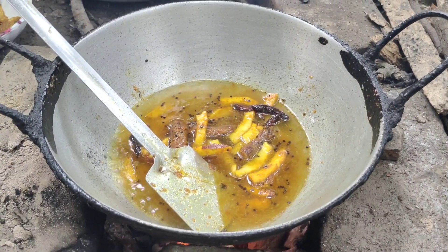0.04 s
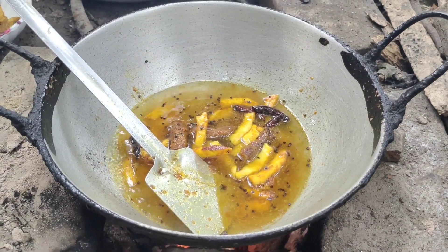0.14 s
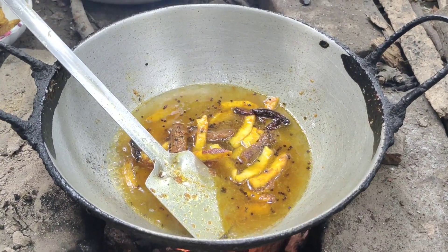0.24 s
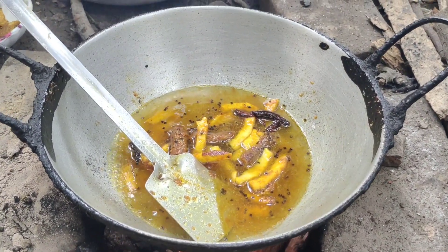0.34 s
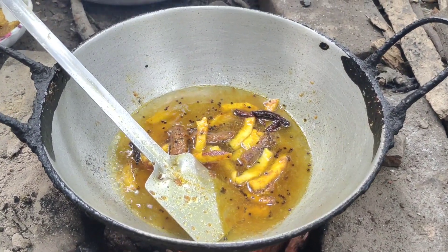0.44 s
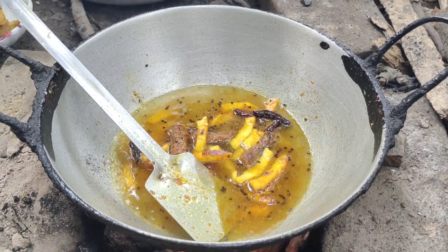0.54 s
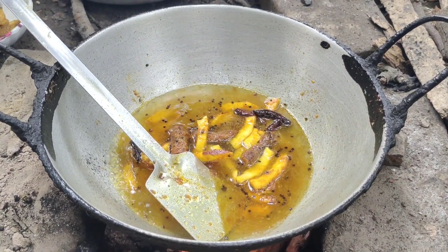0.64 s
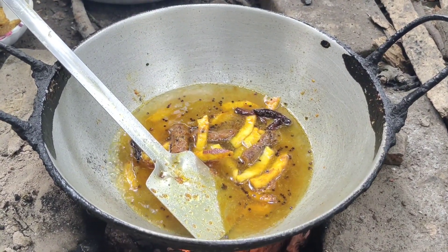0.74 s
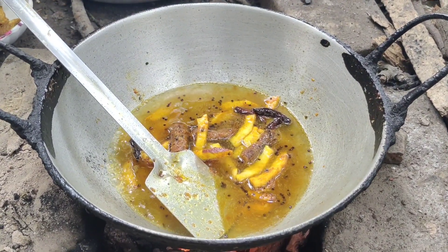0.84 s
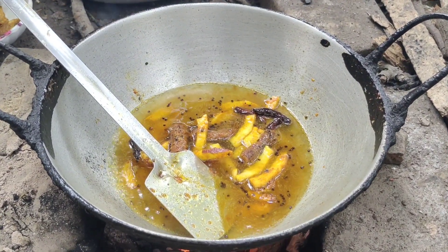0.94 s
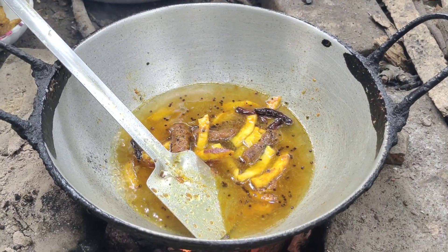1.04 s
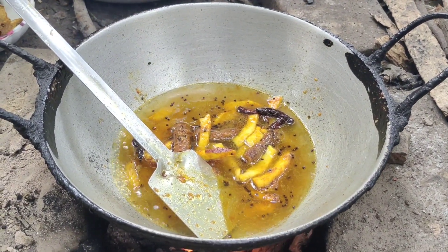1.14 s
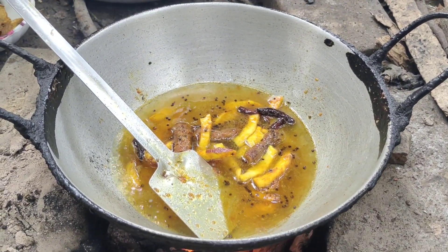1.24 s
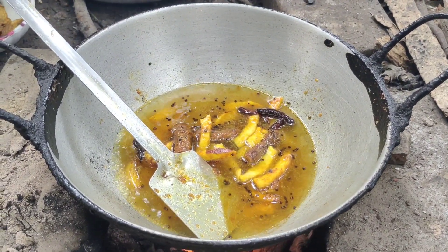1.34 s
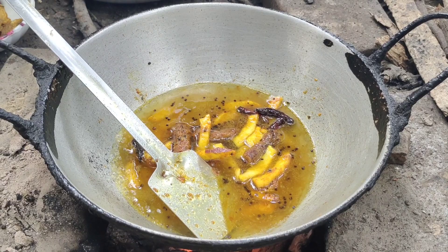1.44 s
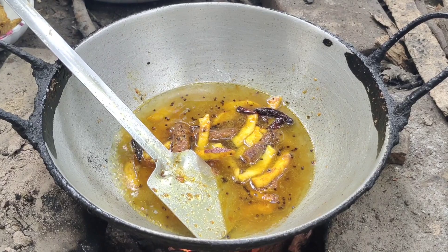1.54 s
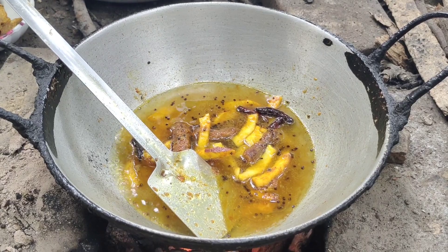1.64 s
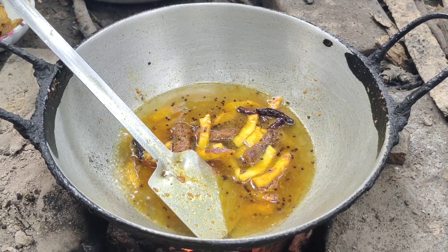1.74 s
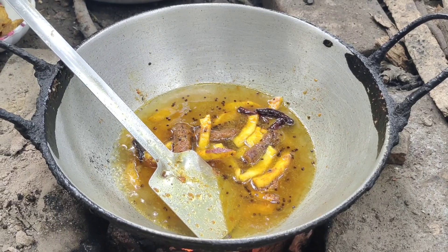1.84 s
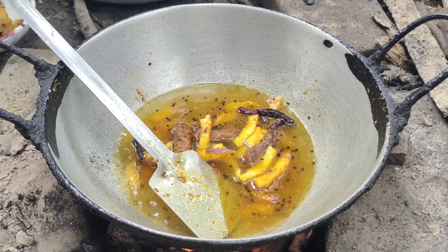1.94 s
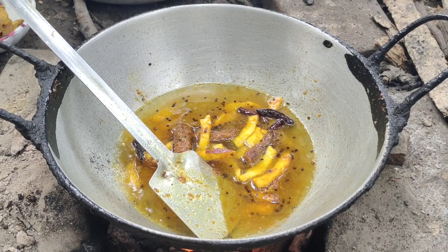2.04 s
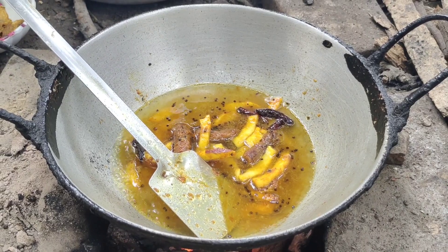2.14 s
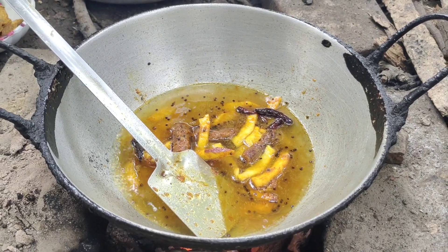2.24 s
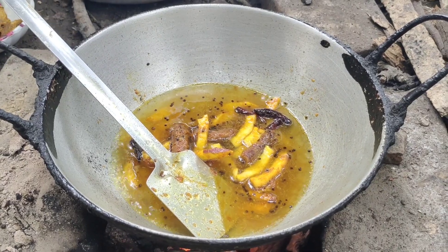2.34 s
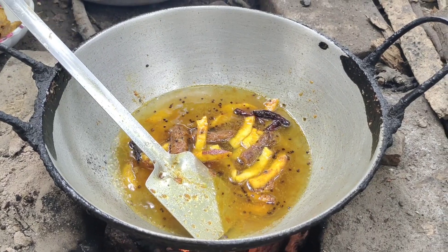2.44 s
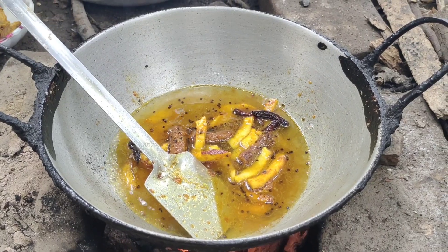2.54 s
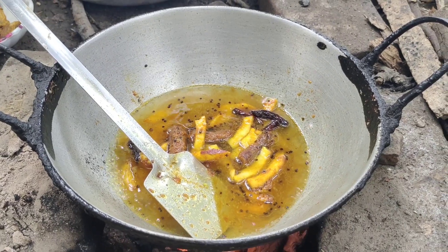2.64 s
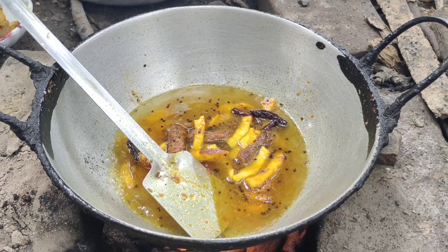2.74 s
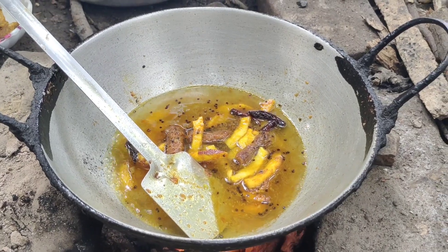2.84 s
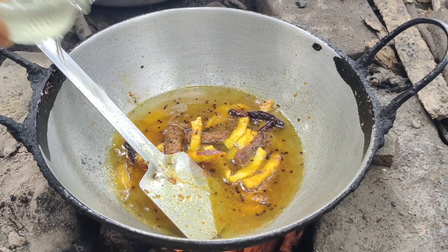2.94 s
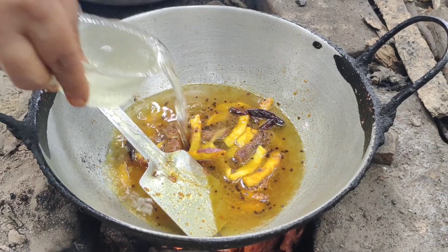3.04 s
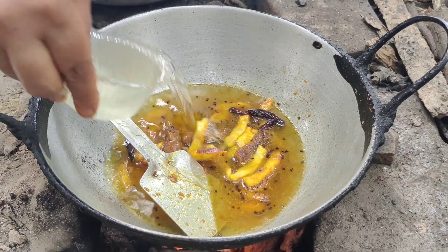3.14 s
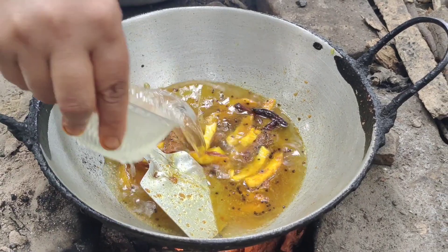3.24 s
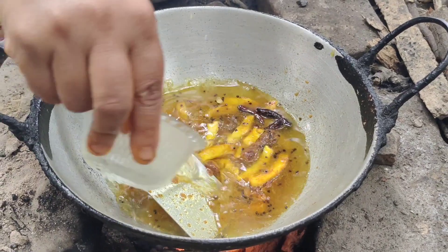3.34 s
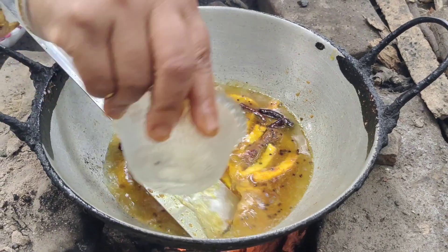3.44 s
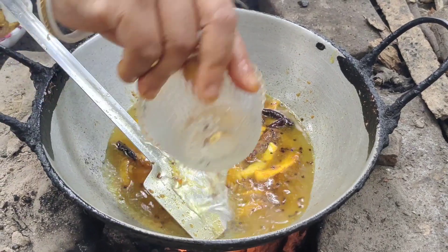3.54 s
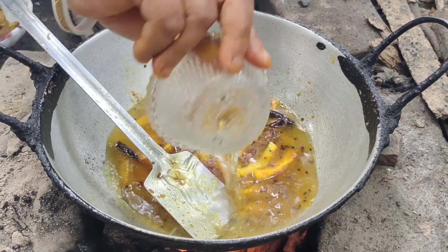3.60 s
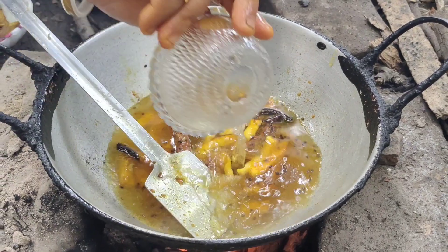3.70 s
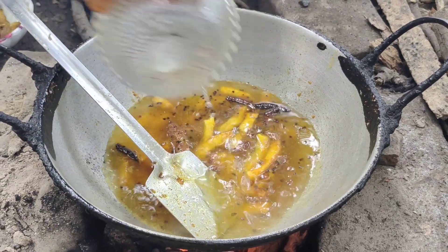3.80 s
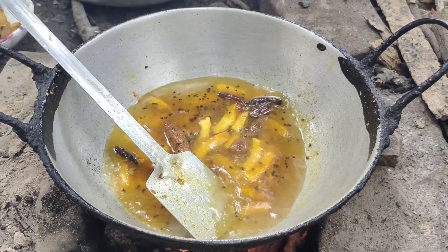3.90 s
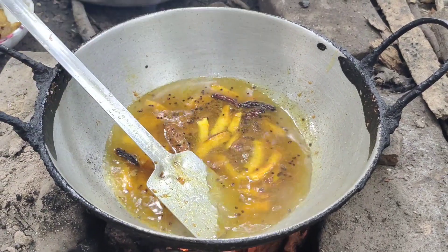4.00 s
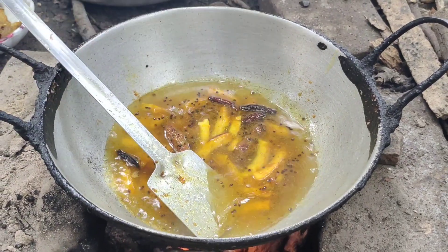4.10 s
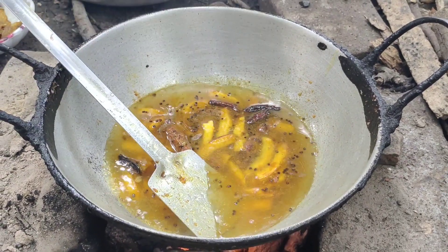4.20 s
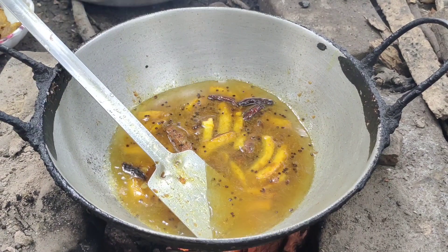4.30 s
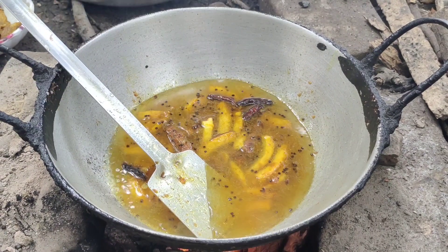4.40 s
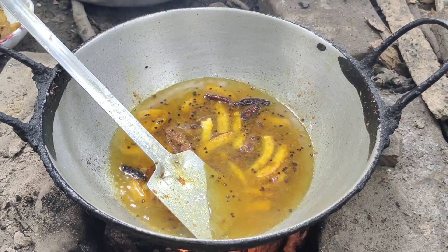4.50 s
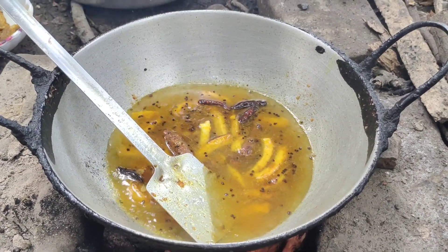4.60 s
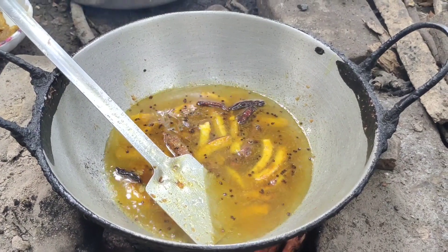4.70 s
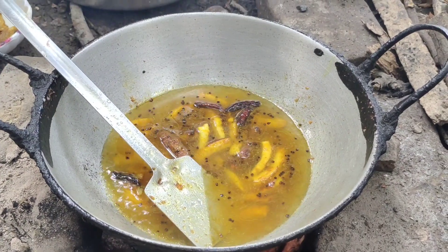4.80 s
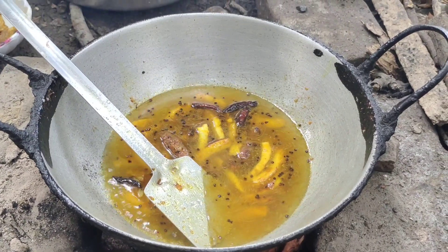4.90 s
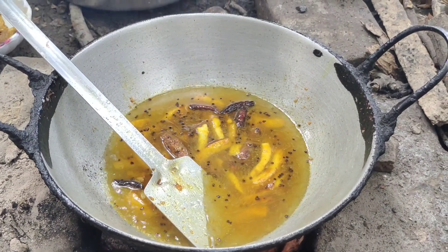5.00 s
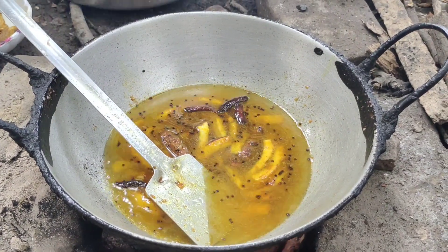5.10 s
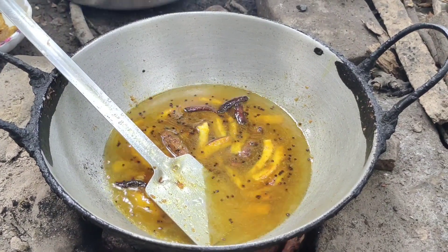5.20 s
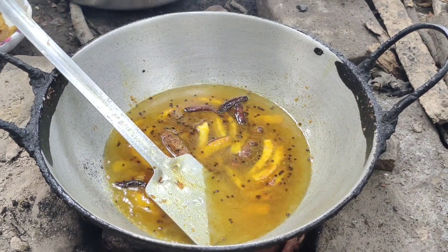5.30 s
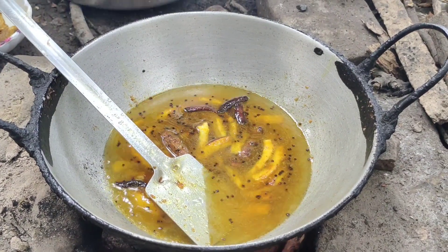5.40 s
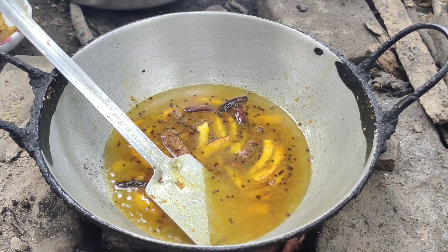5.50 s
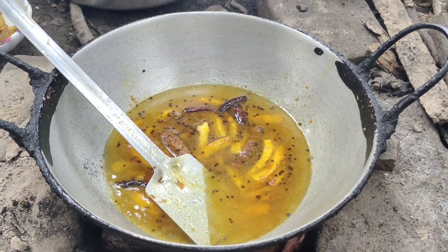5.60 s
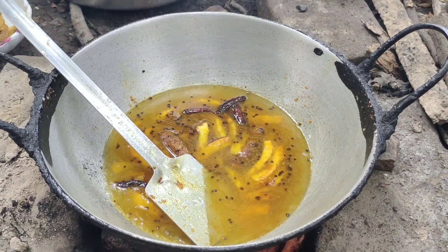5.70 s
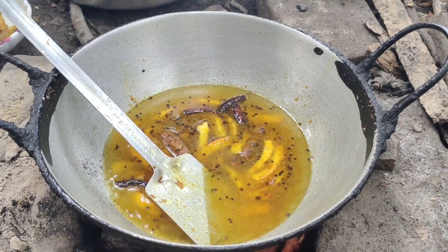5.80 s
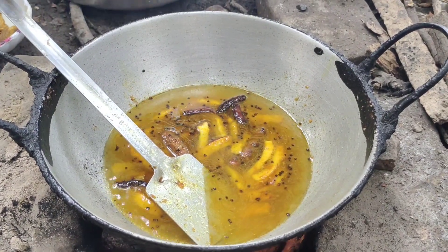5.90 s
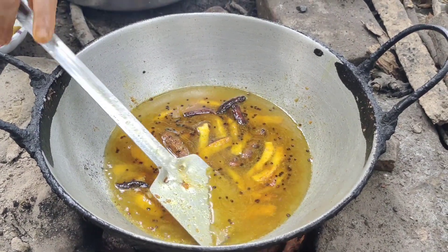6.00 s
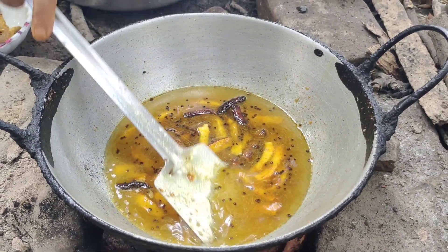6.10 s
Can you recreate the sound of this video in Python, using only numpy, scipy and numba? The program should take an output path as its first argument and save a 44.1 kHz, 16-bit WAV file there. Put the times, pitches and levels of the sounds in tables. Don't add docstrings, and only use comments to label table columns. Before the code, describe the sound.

Close from above, a thin metal pan of broth sizzles, fades to a gentle simmer with sharp spits, while wood knocks, creaks and scrapes on stone. A few soft bloops lead to a cup of water poured in: a bright, roaring steam hiss with loud cracks for over a second. It dies into faint bubbling, another wooden clatter, one ladle clink and low throbbing flames in a quiet yard.

```python
import sys
import numpy as np
from scipy import signal
from scipy.fft import rfft, irfft
from scipy.io import wavfile
from scipy.ndimage import uniform_filter1d, minimum_filter1d
from numba import njit

SR = 44100
rng = np.random.default_rng(int(sys.argv[2]) if len(sys.argv) > 2 else 0)


def gain_from_db(level_db):
    decades = np.asarray(level_db, float) / 20
    return 10 ** decades


def materialize(psi):
    bounded = np.clip(np.atleast_2d(psi).T, -1, 1)
    quanta = np.round(bounded * 32767).astype(np.int16)
    wavfile.write(sys.argv[1], SR, quanta)


N = 271215
T = np.arange(N) / SR
PORT_GAP = 24
WOOD_LAG = -21
HOLLOW_PAN_DB = -1


def unit(x):
    return x / np.sqrt(np.mean(x ** 2))


def tilt(db):
    return gain_from_db(db * np.array([[.5], [-.5]]))


def level_curve(table):
    start_s, level_db = np.transpose(table)
    return gain_from_db(np.interp(T, start_s, level_db))


def swell(start_s, rise_s, hold_s, fall_db_per_s, level_db):
    t = T - start_s
    return np.clip(t / rise_s, 0, 1) * gain_from_db(level_db - fall_db_per_s * np.maximum(t - rise_s - hold_s, 0))


def walk(rate_hz):
    hold = int(SR / rate_hz)
    return uniform_filter1d(np.repeat(rng.standard_normal(N // hold + 1), hold), hold)[:N]


def colour(x, points):
    hz, db = np.transpose(points)
    f = np.maximum(np.arange(N // 2 + 1) * SR / N, 1)
    return irfft(rfft(x) * gain_from_db(np.interp(np.log(f), np.log(hz), db)), N)


def ring(x, modes):
    return sum(gain_from_db(db) * signal.lfilter(*signal.iirpeak(hz, hz / width, SR), x) for hz, width, db in modes)


@njit
def grains(start, lag, hz, cycles, size, rise):
    out = np.zeros((2, N + 8192))
    for k in range(len(start)):
        turn = np.exp((2j * np.pi - 1 / cycles[k]) * hz[k] / SR)
        closing = np.exp(-hz[k] / (cycles[k] * rise * SR))
        z, gap = size[k] + 0j, 1.
        for i in range(min(int(5 * cycles[k] * SR / hz[k]), 4000)):
            out[0, start[k] + i + 64] += z.imag * (1 - gap)
            out[1, start[k] + i + 64 + lag[k]] += z.imag * (1 - gap)
            z *= turn
            gap *= closing
    return out[:, 64:N + 64]


def notes(table, glide):
    out, t = np.zeros(N + 8000), np.arange(-4000, 4000) / SR
    for peak_s, hz, db, length_s in table:
        start = int(peak_s * SR) - 4000
        bell = gain_from_db(db) * np.exp(-(2 * t / length_s) ** 2)
        out[start:start + 8000] += bell * np.sin(2 * np.pi * hz * t * (1 + glide * t / length_s))
    return out[:N]


def echoes(x):
    t60_s, echo_db = 0.2939, -5.5
    t = np.arange(SR // 3) / SR
    tail = rng.standard_normal((2, len(t))) * gain_from_db(-60 * t / t60_s) * (t > .004)
    tail = tail / np.sqrt(np.sum(tail ** 2, axis=1, keepdims=True))
    return x + gain_from_db(echo_db) * signal.fftconvolve(x, tail, axes=1)[:, :N]


# freq_hz, width_hz, level_db
PAN_MODES = [(1350, 42, -9.5), (2050, 23, -26.5), (5055, 71, -9.5), (2555, 42, -13), (4000, 17, -12.5),
             (5567, 27, -7.5), (5700, 10, -47), (6040, 10, -29), (6960, 39, -8)]


def bubbles(points, cycles, spread_db, hiss, swell_db, count):
    when, pitch, place, big = rng.random((count, 4)).T
    hz = 600 * 28 ** pitch
    lag = np.round(PORT_GAP * (2 * place - 1)).astype(int)
    size = hz * gain_from_db(spread_db * np.minimum(-np.log(1 - big), 4.5))
    burst = grains((when * N).astype(int), lag, hz, cycles * (.5 + big), size, 0.2711)
    steam = unit(burst) + hiss * rng.standard_normal((2, N))
    steam = steam + 3.24 * ring(steam, PAN_MODES)
    return unit(colour(steam, points)) * gain_from_db(swell_db * walk(12))


def patchy(x, patch_db, patch_hz, patch_s):
    cells = signal.stft(x, SR, nperseg=512)[2]
    field = rng.standard_normal(cells.shape[1:])
    for axis, size in enumerate([patch_hz * 512 / SR, patch_s * SR / 256]):
        for _ in range(2):
            field = uniform_filter1d(field, int(size), axis=axis)
    return signal.istft(cells * gain_from_db(patch_db * unit(field)), SR, nperseg=512)[1][:, :N]


# start_s, level_db
SIMMER = [(0, -49), (.7, -50), (1.3, -51), (1.9, -51), (2.9, -50.5), (4.6, -46), (5.0, -49), (5.38, -50),
          (5.5, -55), (6.15, -53)]
# freq_hz, level_db (per Hz)
SIMMER_COLOUR = [(800, -9.5), (2000, -3), (3300, -1.5), (3900, 1.5), (4600, 1.5), (5300, 1.5), (6000, 2.5),
                 (7500, 3), (9500, -5), (12000, -4.5), (15500, -4)]
# freq_hz, level_db (per Hz)
FRY_COLOUR = [(1500, -48), (3300, -43), (4300, -8.5), (5100, 2), (6200, 2), (7300, 2.5), (8300, -10),
              (11500, -11.5), (13000, -5.5), (15500, -1)]


def simmering_pan():
    fry = bubbles(FRY_COLOUR, cycles=1.2, spread_db=1.0, hiss=1.0, swell_db=-0.7, count=40000)
    simmer = bubbles(SIMMER_COLOUR, cycles=45, spread_db=1.0, hiss=1.5, swell_db=2.0, count=14000)
    fry_db, sag_db_per_s, fry_ends_s, fade_db_per_s = -36, 7, 0.65, 72
    fry_gain = gain_from_db(fry_db - sag_db_per_s * T - fade_db_per_s * np.maximum(T - fry_ends_s, 0))
    calm = fry * fry_gain + simmer * level_curve(SIMMER) * gain_from_db(0.5)
    return patchy(calm, patch_db=2.0, patch_hz=700, patch_s=0.064)


# start_s, level_db
POUR = [
    (3.0, -77),
    (3.035, -56),
    (3.08, -45),
    (3.2, -34.5),
    (3.5, -33),
    (4.03, -32.5),
    (4.4, -39.5),
    (4.47, -43.5),
    (4.8, -51.5),
    (5.0, -64),
]
# freq_hz, level_db (per Hz)
POUR_COLOUR = [(700, -45), (1300, -19), (1900, -18.5), (2250, -8.5), (4000, -4.5), (5500, -1), (7200, -1.5),
               (8500, -3.5), (10000, -9.5), (13000, -12.5), (15500, -13)]


def poured_water():
    pour = bubbles(POUR_COLOUR, cycles=2.25, spread_db=0.5, hiss=1.0, swell_db=0.5, count=50000)
    first_s, last_s = POUR[0][0], POUR[-1][0]
    stream = level_curve(POUR) * (T > first_s) * (T < last_s)
    surge = swell(start_s=3.486, rise_s=0.03, hold_s=0.028, fall_db_per_s=42, level_db=-26)
    wet_delay_s, growth_s, cooling_power = 0.019, 0.014, 1.465
    wetted = np.clip((T - first_s - wet_delay_s) / 0.09, .35, 1)
    late = np.interp(T - growth_s, T, np.hypot(wetted * stream * gain_from_db(4), surge * gain_from_db(1)))
    late = late.max() * (late / late.max()) ** cooling_power
    big = colour(pour, [(3600, 0), (4600, -60)])
    fine = colour(pour, [(9000, -60), (11000, 0)])
    roar = (pour - big - fine) * np.hypot(stream, surge)
    roar = roar + big * late + fine * np.hypot(stream * gain_from_db(6.5), surge * gain_from_db(1))
    first_hiss = swell(start_s=3.03, rise_s=.04, hold_s=.06, fall_db_per_s=120, level_db=-51)
    last_hiss = swell(start_s=4.62, rise_s=.15, hold_s=.62, fall_db_per_s=200, level_db=-56)
    roar = roar + unit(ring(pour, [(5600, 500, 0)])) * first_hiss
    roar = roar + unit(ring(pour, [(5450, 600, 0)])) * last_hiss
    return patchy(roar, patch_db=0.87, patch_hz=598.0, patch_s=0.057)


# freq_hz, level_db (per Hz)
GURGLE_COLOUR = [(350, -21), (600, -6), (790, 1.5), (1100, -3), (1250, 1), (1350, 6), (1470, 2.5),
                 (1750, -1.5), (2200, -7.5), (2600, -50)]


def gurgle():
    fat = bubbles(GURGLE_COLOUR, cycles=9.812, spread_db=0.5, hiss=0.7, swell_db=1.0, count=6000)
    stirred = swell(start_s=3.1, rise_s=0.15, hold_s=0.78, fall_db_per_s=38, level_db=-52.5)
    return fat * (stirred + gain_from_db(-68.5))


# peak_s, pitch_hz, level_db, length_s
BLOOPS = [(2.14, 714, -58, 0.033), (2.18, 610, -70, .03), (2.36, 692, -57, 0.024), (2.41, 500, -58, 0.038),
          (2.46, 556, -58, 0.033), (2.52, 1960, -58, 0.032), (2.6, 493, -60, 0.035),
          (2.585, 640, -53.5, 0.017), (2.64, 610, -56, 0.056), (2.62, 990, -67, 0.024),
          (2.8, 1280, -54.5, 0.027), (2.85, 804, -60, 0.024), (2.95, 589, -57.5, 0.12)]


def bloops():
    return echoes(np.tile(notes(BLOOPS, glide=0.047), (2, 1)))


# start_s, peak_db, left_minus_right_db, pitch_hz
SPITS = [(0.187, -33, 2, 5100), (0.2457, -28, 5.5, 6860), (0.2624, -27, 10, 7310), (0.3217, -29, 8, 5160),
         (0.405, -33, 12, 5500), (0.483, -27, 2, 7300), (0.589, -29, 10, 7150), (0.6384, -30, 8, 6390),
         (0.6816, -34, 5.5, 6600), (0.9114, -32.5, 2.0, 8700), (1.044, -31, 2.5, 4230),
         (1.1014, -35, 10, 5100), (1.456, -35, 1.0, 9400), (1.5698, -39, 6, 7030),
         (1.6782, -32.5, 3.5, 6170), (1.89, -33, 7, 3700), (2.1735, -37, 3.0, 3670),
         (2.3406, -44, 3.0, 3920), (2.3511, -41, 3.0, 8960), (2.9332, -40, 1, 7610),
         (3.1264, -28.5, 5.0, 7830), (3.1514, -28, 4.5, 7900), (3.166, -30, 5.5, 7740),
         (3.1832, -29, 4.5, 7100), (3.1974, -27, 3.5, 7530), (3.2126, -15, 1, 5460),
         (3.2814, -24, 3.5, 5550), (3.2884, -18, 4.0, 5130), (3.429, -23.5, 2, 5170),
         (3.489, -22, 3.0, 5770), (3.51, -19, 2.5, 6160), (4.358, -18.5, 4, 5500), (4.5195, -31, 6, 4890),
         (4.5291, -30, 7, 4870), (4.66, -26.5, 3.0, 6000), (4.6907, -38, 3.0, 7290), (4.7494, -42, 7, 5110),
         (4.7574, -35, 5, 9280), (4.783, -29.5, 4.0, 7760), (4.9841, -42, 5.0, 5330),
         (5.1123, -35, 0, 5380), (5.1323, -31, 2.5, 6900), (5.282, -43, 3.5, 3890), (5.788, -40, 3.5, 6560),
         (5.8586, -40, 3.0, 7200), (5.9219, -40, 2.0, 7770), (6.0721, -42, 0.5, 9200),
         (0.4974, -40, 5.5, 6770), (0.533, -33, 7.0, 6790), (3.219, -23, 6.5, 7400),
              (3.367, -25, 4.0, 7250), (3.398, -25, 5, 5260), (3.426, -24, 2, 4890),
              (3.541, -19, 3.5, 5750), (3.6274, -22, 5, 5570), (4.236, -25, 2.0, 8660),
              (4.294, -27, -2, 5450), (4.316, -27, 3.5, 5350), (4.3914, -29, 2.5, 5440),
              (4.4006, -25, 1, 6080), (4.429, -25, 2.5, 6000)]


def spits():
    out, n = np.zeros((2, N + 600)), np.arange(500)
    for start_s, peak_db, pan_db, hz in SPITS:
        noise = rng.standard_normal((3, 500))
        ping = np.sin(2 * np.pi * hz * n / SR) * np.exp(-n / 22.7) * np.minimum(n / 12.4, 1)
        snap = np.sign(noise[2]) * np.exp(-n / 8.4)
        fizz = noise[:2] * np.exp(-n / 250.0)
        start = int((start_s + 0.0013) * SR)
        crack = 2.3 * snap + 2.2 * ping + 0.51 * fizz
        out[:, start:start + 500] += crack * gain_from_db(peak_db - 3.5) * tilt(0.6 * pan_db)
    return colour(out[:, :N], [(1200, -34), (3000, -8.5), (5500, 0.0), (9000, -2.0), (12500, -6.0), (15500, 0.0)])


# start_s, thud_hz, thud_db, tick_hz, tick_db
KNOCKS = [(0.003, 292.8, -37, 2560, -44.5), (0.039, 295, -34, 2050, -25.5), (0.241, 455, -34.5, 2599, -46),
          (0.258, 447, -59, 1456, -57), (0.3212, 504, -38.5, 2244, -21), (0.3272, 460, -42.5, 2320, -26.5),
          (0.914, 223, -58, 2110, -44), (1.001, 484, -45, 1790, -63), (1.044, 303, -49.5, 1670, -36),
          (1.566, 654, -40.5, 1230, -39), (1.604, 696.1, -48, 2670, -68), (1.797, 419.6, -32, 1350, -30),
          (1.868, 450, -41, 1345, -23), (1.889, 465, -38, 1860, -35), (1.959, 400, -46, 2420, -41),
          (2.691, 328, -62, 2300, -41), (5.076, 220, -36, 1914, -53), (5.096, 230, -37.5, 1255, -30),
          (5.165, 256, -34.5, 1365, -47.5), (6.027, 390, -48, 1540, -41)]


def knocks():
    thud_ring_s, tick_ring_s = 0.024, 0.0024
    start_s, thud_hz, thud_db, tick_hz, tick_db = np.repeat(KNOCKS, 3, axis=0).T
    off = np.tile([-1, 0, 1], len(KNOCKS))
    start, lag = ((start_s + 0.001585) * SR).astype(int), np.full(len(start_s), WOOD_LAG)
    thud_size = gain_from_db(thud_db - 2.0 - 13.4 * abs(off))
    tick_size = gain_from_db(tick_db - 1.0 - 12.0 * abs(off))
    thud = grains(start, lag, thud_hz * (1 + 0.1 * off), thud_ring_s * thud_hz, thud_size, 0.047)
    tick = grains(start, lag, tick_hz * (1 + 0.13 * off), tick_ring_s * tick_hz, tick_size, 0.18)
    blows = thud * tilt(HOLLOW_PAN_DB) + tick
    return echoes(colour(blows, [(80, -32.0), (200, -1.5), (2700, 2.5), (3300, -8.0)]))


# peak_s, pitch_hz, level_db, length_s
CREAKS = [(0.323, 3770, -40, 0.0034), (0.246, 760, -37.5, 0.006), (3.26, 1100, -53, .015),
          (3.3, 1013, -54, .012), (1.004, 1800, -35.5, 0.0034), (1.024, 1740, -53, .008),
          (1.058, 1790, -48, 0.009), (1.083, 1650, -35, 0.011), (1.8, 1880, -34.5, 0.0039),
          (1.8, 1060, -31, 0.0053), (1.818, 2380, -43, 0.0071), (1.816, 395, -59, .014),
          (1.84, 436, -32.5, 0.0088), (1.856, 430, -29.5, 0.013), (1.858, 1800, -37, .008),
          (1.871, 2420, -36.5, 0.0062), (1.892, 454, -36, 0.0072), (1.906, 1400, -41, .008),
          (1.925, 1280, -43, .02), (1.82, 1310, -37, 0.017), (1.875, 910, -50, .02),
          (1.926, 440, -39, .018), (1.81, 3730, -45, 0.008), (1.93, 3850, -47, .012),
          (1.963, 2420, -35, 0.0047), (1.962, 1700, -43, .01), (1.965, 470, -43, 0.013),
          (1.98, 1950, -50, .01), (1.982, 415, -42, .01), (1.998, 480, -49, 0.016),
          (2.026, 506, -56, 0.013), (2.17, 3780, -54, 0.016), (2.27, 3900, -59, 0.015),
          (2.343, 3880, -45.5, 0.0058), (2.43, 2350, -53, .015), (5.057, 473, -34.5, 0.0048),
          (5.057, 1330, -40, 0.0082), (5.08, 1900, -38.5, 0.011), (5.08, 1045, -35, 0.011),
          (5.095, 2050, -43, .012), (5.097, 1350, -36, .012), (5.12, 1320, -45, 0.018),
          (5.155, 2050, -44, 0.02), (5.17, 1376, -35, .012), (5.18, 2055, -40, .016),
          (5.185, 1420, -38, 0.013), (5.215, 2080, -45, .012), (5.23, 1590, -48, .02),
          (5.25, 1560, -47, .02), (5.268, 1940, -55, .014), (5.31, 1510, -52, 0.028),
          (5.284, 4000, -43, 0.0085), (5.7, 1654, -52.5, 0.037), (6.09, 1386, -52, 0.035)]


def creaks():
    wood = np.roll(notes(CREAKS, glide=0), -WOOD_LAG // 2)
    return echoes(np.array([wood, np.roll(wood, WOOD_LAG) * gain_from_db(-5.0)]))


# start_s, hold_s, body_db, rasp_db
SCRAPES = [(0.0, 0.021, -48.5, -50), (0.038, 0.00788, -52, -43), (0.238, 0.00651, -50.5, -61),
           (0.318, 0.00316, -67, -41.5), (0.993, 0.022, -51.5, -65), (1.03, 0.02953, -83, -55),
           (1.794, 0.011, -42.5, -61), (1.838, 0.048, -46, -57), (1.899, 0.03236, -54.5, -53),
           (1.961, 0.03, -56, -55), (4.497, 0.22, -61.5, -81), (5.037, 0.017, -46.5, -56),
           (5.073, 0.03, -56, -54), (5.113, 0.01, -58, -60), (5.148, 0.046, -50, -46),
           (5.21, 0.04, -72, -58), (5.635, 0.17, -75, -58), (6.013, 0.02296, -64, -58.5),
           (6.09, 0.015, -75, -56)]
# freq_hz, width_hz, level_db
BODY = [(240, 32, -0.5), (336.4, 300, -12), (405, 210, 13), (549.6, 80, -9)]
# freq_hz, width_hz, level_db
RASP = [(997, 190, 10.5), (1353, 270, 15), (1590, 80, 1), (1944, 67, 7.5), (2420, 110, -9.5)]
# freq_hz, width_hz, level_db
LADLE = [(4320, 45, -14), (5344, 13, 0), (6666.8, 19, -2), (6885, 41, -8), (9100, 57.7, -30)]


def scrapes():
    rise_s, body_fall_db_per_s, rasp_fall_db_per_s = 0.0034, 190, 249
    slips = rng.standard_normal((2, N)) * gain_from_db(4.0 * rng.standard_normal(N) + 1.5 * walk(80))
    slips = np.array([slips[0], np.roll(slips[0], WOOD_LAG) + 0.65 * slips[1]])
    body_gain = sum(swell(s, rise_s, hold, body_fall_db_per_s, db) for s, hold, db, _ in SCRAPES)
    rasp_gain = sum(swell(s, rise_s, hold, rasp_fall_db_per_s, db) for s, hold, _, db in SCRAPES)
    body = unit(ring(slips, BODY)) * body_gain * tilt(HOLLOW_PAN_DB)
    rasp = unit(ring(slips, RASP)) * rasp_gain
    clink_s, clink_db, clink_t60_s = 5.165, -33, 0.18
    since = T - clink_s
    clink_gain = gain_from_db(clink_db - 60 * np.maximum(since, 0) / clink_t60_s) * np.clip(since / 0.0094, 0, 1)
    clink = unit(ring(slips, LADLE)) * clink_gain
    return colour(body + rasp, [(2500, -0.5), (3600, 1.5)]) + clink


# peak_s, peak_db, length_s
PUFFS = [(0.0, -45, 0.05318), (0.198, -65, 0.048), (0.497, -54.5, 0.042), (0.722, -70, 0.0615),
         (1.03, -53.5, 0.1254), (1.15, -65, 0.1), (1.28, -58.5, 0.19), (1.526, -52, 0.071),
         (1.622, -55, 0.071), (1.82, -54.5, 0.099), (2.104, -63, 0.047), (2.307, -71, 0.12),
         (2.52, -55.5, 0.2267), (2.828, -59, 0.0673), (3.08, -54, 0.15), (3.33, -52.5, 0.19),
         (3.537, -51.5, 0.15), (3.785, -47, 0.12), (4.074, -50, 0.29), (4.351, -48, 0.11),
         (4.62, -47.5, 0.22), (4.954, -52, 0.27), (5.12, -49.5, 0.1766), (5.246, -52.5, 0.09),
         (5.396, -44, 0.23), (5.612, -40, 0.16), (5.772, -41.5, 0.14), (5.94, -45.5, 0.095),
         (6.096, -53, 0.069)]


def fire():
    hearth_hz, hearth_width_hz, ember_db, rumble_db = 133.9, 6.5, -76, -57.5
    puffs = sum(gain_from_db(db) * np.exp(-(2 * (T - s) / length) ** 2) for s, db, length in PUFFS)
    draught = gain_from_db(ember_db) + puffs
    loose = unit(uniform_filter1d(draught, int(0.27 * SR))) ** 0.32
    gust = rng.standard_normal((3, N))
    throb = ring(ring(gust[0], [(hearth_hz, hearth_width_hz, 0)]), [(hearth_hz, 90, 0)])
    throb = throb / (np.abs(signal.hilbert(unit(throb))) + 0.57) ** 0.63
    flutter = colour(gust[2], [(110, -46), (160, 15.5), (220, 8.5), (320, -54.0)])
    rumble = colour(gust[1], [(25, -43.5), (60, -24), (98, 6.5), (115, -1.5), (150, -28.5)])
    return (unit(throb) + 0.36 * unit(flutter)) * draught + unit(rumble) * loose * gain_from_db(rumble_db)


# freq_hz, level_db (per Hz)
YARD_COLOUR = [(15, -65.5), (25, -49), (59, -8.5), (82, -15), (129, -1), (255, -5.5), (331, -8.5),
               (421, -10.5), (580, -9.5), (866, -13.5), (3000, -41), (3900, -38), (6600, -120)]
# freq_hz, level_db
HUM = [(328.4, -71), (393.0, -73.5), (591, -73)]


def yard():
    mid, side, drive = rng.standard_normal((3, N))
    side = colour(side, [(25, -30), (60, -10), (150, -10.5), (400, -7.5), (1300, -4.0)])
    air = unit(colour(mid + side * np.array([[1], [-1]]), YARD_COLOUR)) * gain_from_db(-58.5 + 2.0 * walk(5))
    return air + sum(gain_from_db(db) * unit(ring(drive, [(hz, 4, 0)])) for hz, db in HUM)


def scene():
    cooking = simmering_pan() + poured_water() + gurgle() + bloops() + spits()
    return cooking + knocks() + creaks() + scrapes() + fire() + yard()


# freq_hz, level_db
MASK = [(1500, -9), (2100, -4.5), (2600, -5), (2950, -2), (3500, -2), (4300, -4.5), (5500, -6.5),
        (9000, -5), (11300, -1.5), (12600, -4.5), (14000, -4), (15500, -4)]


def thin(x):
    top_hz = 15500
    f, _, cells = signal.stft(x, SR, nperseg=2048, noverlap=1536)
    power = (np.abs(cells) ** 2).mean(axis=0)
    hz, db = np.transpose(MASK)
    patch = uniform_filter1d(uniform_filter1d(power, size=5, axis=0), size=3, axis=1)
    patch = minimum_filter1d(minimum_filter1d(patch, size=4, axis=0), size=3, axis=1)
    around = uniform_filter1d(power * (f > hz[0] / 4)[:, None], size=41, axis=0) + 1e-20
    steady = np.exp(uniform_filter1d(np.log(around), size=21, axis=1))
    around = np.minimum(uniform_filter1d(around, size=3, axis=1), steady)
    hidden = patch < around * gain_from_db(2 * np.interp(f, hz, db))[:, None]
    dropped = hidden & (f > hz[0])[:, None] | (f > top_hz)[:, None]
    return signal.istft(cells * ~dropped, SR, nperseg=2048, noverlap=1536)[1][:, :N]


def low_pass(x):
    return signal.sosfilt(signal.butter(12, 15740, fs=SR, output="sos"), x)


# freq_hz, level_db
RIGHT_PORT = [(300, 0), (1300, -2), (2500, 0.5), (3500, 1), (5000, -7), (7500, -9), (8400, -2), (9200, 7.5),
              (10500, 3), (12000, -3), (13500, -7.5), (15500, -39)]


def record(dry):
    ports = np.array([dry[0], colour(dry[1], RIGHT_PORT)])
    return low_pass(thin(ports))


dry = scene()
out = record(dry)
materialize(out)
```